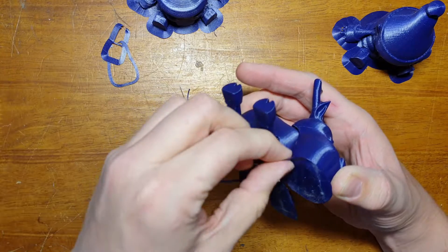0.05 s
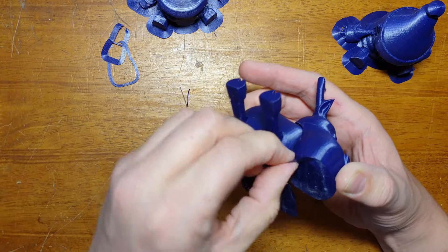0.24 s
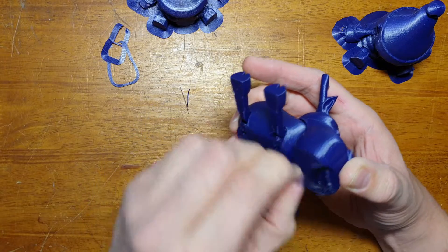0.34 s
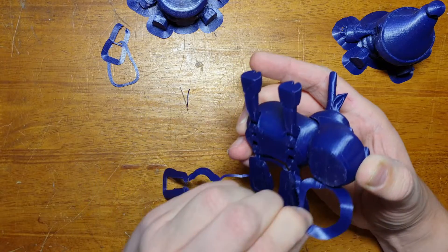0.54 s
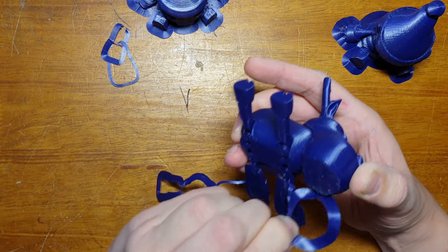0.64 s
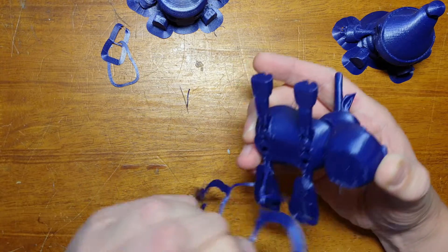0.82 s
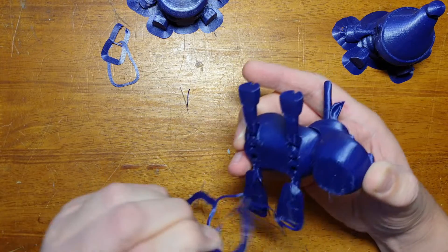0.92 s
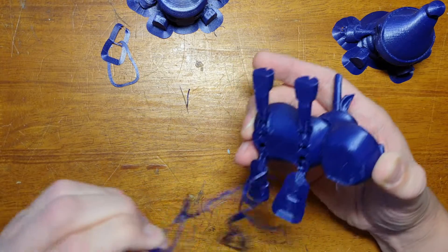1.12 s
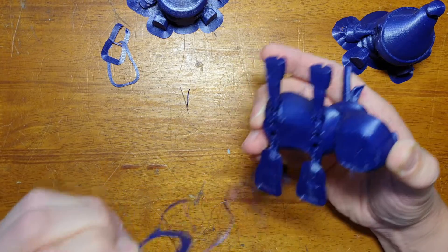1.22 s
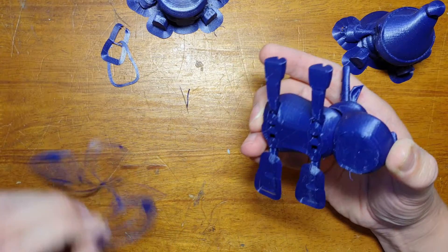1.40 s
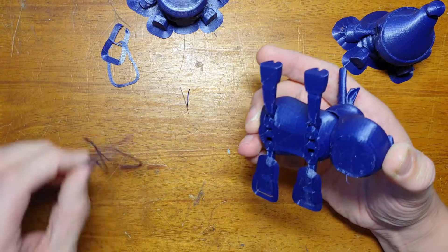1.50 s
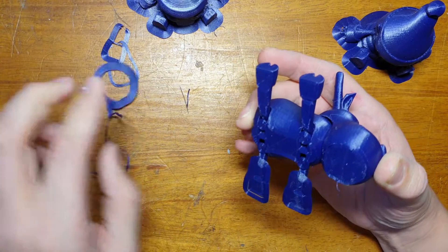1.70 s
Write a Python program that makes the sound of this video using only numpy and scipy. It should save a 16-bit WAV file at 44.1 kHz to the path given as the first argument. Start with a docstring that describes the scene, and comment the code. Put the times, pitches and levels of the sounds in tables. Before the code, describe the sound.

Brittle plastic strip snaps and crackles as fingers pull it off a small printed figure over a wooden table, building to a fast tearing run and a loudest last crack, then faint rubbing; close, dry, small room.

```python
"""A thin plastic brim is peeled by hand off a small printed figure, just above a wooden table in a small room.
Over quiet air (filtered noise), faint finger rumble and rubbing (noise following level curves) come first;
then ticks and snaps (bursts, snaps with rings), runs of tearing (random clicks and chips), soft bumps (dying
sines) and squeaks (gliding sines). A long rip rings the strip's modes, the hollow figure knocks, a deep sway
swells and a very high whistle rings. The last loud snap has a grainy tail; then fingers rub the loose strip."""
import sys
import numpy as np
from scipy import signal
from scipy.fft import rfft, irfft, next_fast_len
from scipy.io import wavfile
from scipy.ndimage import uniform_filter1d

SR = 44100
rng = np.random.default_rng(int(sys.argv[2]) if len(sys.argv) > 2 else 0)


def digitize_waveform(pressure):
    """Quantize a signal to 16-bit integers and store it at the path in sys.argv[1].

    Rows of a 2-D input are taken as channels; values are limited to [-1, 1].
    """
    field = np.atleast_2d(pressure).T
    bounded = np.clip(field, -1, 1)
    quanta = np.round(bounded * 32767).astype(np.int16)
    wavfile.write(sys.argv[1], SR, quanta)


N = 77175  # length in samples
T = np.arange(N) / SR  # time in seconds
LEFT_RIGHT = np.array([[1], [-1]])


def from_db(db):
    """Decibels to gain."""
    return 10 ** (np.asarray(db) / 20)


def unit(x):
    """Scale a stereo sound to an average energy of one per channel."""
    return x / np.sqrt(np.sum(x ** 2) / 2 + 1e-20)


def add(out, start_s, x):
    """Mix x into out from a start time, cutting it at the end of the scene."""
    i = int(np.clip(start_s * SR, 0, N - 1))
    out[:, i:i + x.shape[1]] += x[:, :N - i]


# Edges of the low, middle, treble and top bands. Each entry: frequency in Hz.
BAND_EDGES_HZ = [470, 1700, 4500, 9500, 17500]


def band(x, k):
    """Keep the low, middle, treble or top band (k = 0 to 3)."""
    sos = signal.butter(3, BAND_EDGES_HZ[k:k + 2], "band", fs=SR, output="sos")
    return signal.sosfilt(sos, x)


def pair(size, alike):
    """Stereo white noise; alike is the correlation of left and right."""
    mid, side = rng.standard_normal((2, size))
    c = np.clip(alike, -1, 1)
    return np.sqrt((1 + c) / 2) * mid + np.sqrt((1 - c) / 2) * side * LEFT_RIGHT


def coloured(x, points):
    """Filter by a curve of (Hz, dB) points, joined by straight lines over log frequency."""
    hz, db = np.transpose(points)
    size = next_fast_len(N + SR // 10)
    f = np.maximum(np.fft.rfftfreq(size, 1 / SR), 1)
    gain = from_db(np.interp(np.log(f), np.log(hz), db))
    return irfft(rfft(x, size) * gain, size)[:, :N]


def noise(points, alike):
    """Coloured stereo noise of rms one."""
    return unit(coloured(pair(N, alike), points)) * np.sqrt(N)


def level_curve(points):
    """Gain over the whole scene from (s, dB) points."""
    return from_db(np.interp(T, *np.transpose(points)))


def sine(t, hz):
    """A steady sine, the same on both sides."""
    return np.sin(2 * np.pi * hz * t) * np.ones((2, 1))


def ring(t, hz, t60, phase_spread):
    """A dying sine of unit energy; its phase (radians) is drawn apart for each side."""
    phase = phase_spread * rng.standard_normal((2, 1))
    return unit(from_db(-60 * t / t60) * np.sin(2 * np.pi * hz * t + phase))


# Left-right correlation of the fracture noise. One entry per band, low to top.
LIKENESS = [0.87, 0.47, 0.011, 0.089]


def burst(shape, shares_db):
    """Stereo noise under an envelope, with a given energy in each band."""
    out = 0
    for k, db in enumerate(shares_db):
        out = out + from_db(db) * unit(band(shape * pair(len(shape), LIKENESS[k]), k))
    return out


def placed(x, db, pan):
    """Set the level of a short sound; pan is left over right in dB."""
    per_10_ms = np.sqrt(SR / 100)  # unit energy becomes rms one over 10 ms
    return x * per_10_ms * from_db(db + pan * LEFT_RIGHT / 2)


# Random grains: rate, spread of their sizes, amplitude decay.
GRAINS_PER_S, GRAIN_SPREAD_DB, GRAIN_S = 480, 2.2, 0.0008


def grain_power():
    """Power of decaying grains at random moments and of random sizes; mean one."""
    born = rng.random(N) < GRAINS_PER_S / SR
    # twice the dB, since these are powers
    sizes = born * from_db(2 * GRAIN_SPREAD_DB * np.minimum(rng.exponential(1, N), 3))
    power = signal.lfilter([1], [1, -np.exp(-2 / (GRAIN_S * SR))], sizes + 1e-18)
    return power / power.mean()


# Colour of the room's air. Each row: frequency in Hz, relative level in dB.
AIR_COLOUR = [(30, -17), (110, 1), (240, -2), (400, -12.5), (550, -9), (900, -24.5), (3000, -37.5),
              (15000, -52.5)]
AIR_DB = -58  # rms


def air():
    """The quiet murmur of the room: steady noise, strongest in the bass."""
    return from_db(AIR_DB) * noise(AIR_COLOUR, 0.82)


# Dull rumble of the fingers on the figure. Each row: time in seconds, level in dB before the trim.
RUMBLE = [(0, -65), (.42, -56), (.48, -53), (.72, -70.5), (.93, -50.5), (1.03, -37.5), (1.14, -48),
          (1.36, -64.5), (1.44, -49), (1.75, -54)]
# Its colour. Each row: frequency in Hz, relative level in dB.
RUMBLE_COLOUR = [(35, -22.5), (70, -12), (130, -13), (250, -23), (600, -39.5), (2000, -68)]
RUMBLE_TRIM_DB = -2.5


def rumble():
    """Finger movement as nearly mono low noise that swells and sinks."""
    return from_db(RUMBLE_TRIM_DB) * level_curve(RUMBLE) * noise(RUMBLE_COLOUR, 0.99)


# Skin rubbing on plastic. Each row: time in seconds, level in dB.
RUB = [(0, -71.5), (.08, -86), (.4, -76), (.62, -55.5), (.74, -83.5), (1.0, -51), (1.33, -58),
       (1.39, -62.5), (1.41, -55), (1.47, -53.5), (1.53, -64), (1.59, -56.5), (1.7, -67), (1.745, -53)]
# Its colour. Each row: frequency in Hz, relative level in dB.
RUB_COLOUR = [(300, -7), (700, -5.5), (1200, -12.5), (2500, -25), (4800, -11.5), (15500, -13)]
RUB_GRAINY = 0.4  # share of the power that comes in grains


def rubbing():
    """Skin on plastic as wide noise, part smooth and part grainy."""
    grain = np.sqrt(1 - RUB_GRAINY + RUB_GRAINY * grain_power())
    return level_curve(RUB) * noise(RUB_COLOUR, 0.073) * grain


# Single threads parting. Each row: start in seconds, level in dB, left over right in dB.
TICKS = [(0.0967, -34, 2), (0.3316, -29.5, 1.5), (0.825, -16, 4), (1.0366, -27, 6), (1.0662, -18.5, 4),
         (1.0807, -21, 0), (1.138, -25, -7), (1.3607, -38, 3), (1.575, -45, 7)]
# Energy share of a tick in dB. One entry per band, low to top.
TICK_BANDS_DB = [-35.5, -25, -17.5, -11.5]
TICK_S = 0.003  # decay time constant


def ticks():
    """Thin threads break with a dry, bright click that dies at once, with no flutter."""
    out, shape = np.zeros((2, N)), np.exp(-T[:SR // 20] / TICK_S)
    for start, db, pan in TICKS:
        add(out, start, placed(burst(shape, TICK_BANDS_DB), db, pan))
    return out


EDGE_SHARE_DB = -6  # energy share of a snap's top band
SHARD_HZ, SHARD_DB, SHARD_T60_S = (3500, 16000), -3, 0.018


def shards(t, treble_db, count=6):
    """A broken edge rings at a few pitches of its own, drawn one from each step of a range."""
    edges = np.geomspace(*SHARD_HZ, count + 1)
    pitches = rng.uniform(edges[:-1], edges[1:])
    levels = np.interp(pitches, BAND_EDGES_HZ[2:4], [treble_db, EDGE_SHARE_DB])
    out = 0
    for hz, db in zip(pitches, levels):
        gain = from_db(db + SHARD_DB) * np.sqrt(hz / pitches.sum())
        out = out + gain * ring(t, hz, SHARD_T60_S, 1.73)
    return out


# The brim snaps; the free length of strip, and so its ring, changes each time.
# Each row: start in seconds, level in dB before the trim, low, middle and treble energy shares in dB,
# left over right in dB, ring of the strip in Hz.
SNAPS = [(0.121, -28.5, -26.5, -19, -14.5, 0.5, 3050), (0.1469, -25, -18.5, -16.5, -15.5, 1, 3980),
         (0.2337, -22.5, -26.5, -16, -36, 1, 4050), (0.244, -27, -32, -15.5, -33, -3, 4310),
         (0.2819, -22, -40, -19, -16.5, 1.5, 3360), (0.349, -27, -44, -23, -15.5, -1.5, 2750),
         (0.3718, -29, -39.5, -15.5, -22, 0, 3020), (0.4337, -28, -31, -17, -19.5, -6, 3080),
         (0.4572, -19, -25.5, -21, -34.5, 1, 3024), (0.468, -21, -27.5, -10, -11.5, 0, 3670),
         (0.497, -22, -46, -27, -13, 3.5, 4070), (0.5124, -12.5, -29, -15, -12.5, 0, 3670),
         (0.5213, -14.5, -27, -8.5, -15.5, 3.5, 2324), (0.5663, -20.5, -20.5, -10, -15.5, 2, 3083),
         (0.7678, -29, -17, -16, -9, 9, 2680), (0.7825, -16.5, -16, -8, -10, -1, 2180),
         (0.7944, -26.5, -37, 0.5, -17.5, 6, 2900), (0.8064, -23.5, -31, -40, -3.5, -5, 3350),
         (0.819, -17, -24.5, -4.5, -20, 2.5, 2180), (0.8383, -21.5, -7, -1.5, -1, 0.5, 2790),
         (0.8563, -15, -19, -6.5, -5.5, 0.5, 3080), (0.8908, -21, -14, -9, -8.5, 1.5, 2854),
         (0.9247, -23.5, -16.5, -8.5, -7, 1, 3250), (0.9624, -28.5, -22.5, -22, -6.5, 0.0, 2900),
         (1.0069, -16, -16, -10.5, -8.5, 2, 3230), (1.0234, -24.5, -11, -17, -16, 1, 3460),
         (1.0481, -29, -15.5, -10.5, -7, -11, 3300), (1.0632, -17.5, -22.5, -21, -14, 2.5, 3100),
         (1.0786, -23.5, -32, -20, -14, 2, 2195), (1.101, -26.5, -19, -7, -7, 0.0, 2940),
         (1.1478, -16.5, -21, -8, -10, 2, 2950), (1.1979, -7, -23.5, -12, -12, 1, 3090),
         (1.4042, -41, -17.5, -33, -15, 8.5, 4630)]
SNAP_TRIM_DB, CRACK_DB = -3.5, 3.5  # overall trim; crack against flutter
# Time constants: decay of the fracture, decay of the shaken strip, softening of the onset.
CRACK_S, FLUTTER_S, SNAP_RISE_S = 0.00022, 0.0057, 0.00062
TABLE_ECHO_S, TABLE_ECHO_DB = 0.0021, -12
RING_DB, RING_T60_S = -2.5, 0.024  # ring level is against the middle share


def snaps():
    """A sharp fracture, its echo off the table, brief flutter, and the rings of strip and broken edge."""
    out, t = np.zeros((2, N)), T[:SR // 16]
    crack = from_db(CRACK_DB) * np.exp(-t / CRACK_S)
    echo = from_db(TABLE_ECHO_DB) * np.interp(t - TABLE_ECHO_S, t, crack, left=0)
    flutter = np.exp(-t / FLUTTER_S)
    shape = (crack + echo + flutter) * (1 - np.exp(-t / SNAP_RISE_S))
    for start, db, low, middle, treble, pan, hz in SNAPS:
        fracture = burst(shape, [low, middle, treble, EDGE_SHARE_DB])
        strip_ring = from_db(middle + RING_DB) * ring(t, hz, RING_T60_S, 0.4)
        snap = fracture + strip_ring + shards(t, treble)
        add(out, start, placed(snap, db + SNAP_TRIM_DB, pan))
    return out


CHIP_T60_S = 0.012


def chips(pull, k):
    """Tiny grains that each ring at one random pitch in band k, as strong as the pull."""
    out, draws = np.zeros((2, N)), rng.random((int(GRAINS_PER_S * N / SR), 3))
    sizes = from_db(-GRAIN_SPREAD_DB * np.log(np.maximum(draws[:, 2], 1 / 20)))
    sizes = sizes / np.sqrt(np.mean(sizes ** 2))
    for n, ((when, pitch, _), size) in enumerate(zip(draws, sizes)):
        i = int((n + when) / len(draws) * N)  # one chip at random in each equal slot
        if pull[i] > 0:
            hz = np.interp(pitch, [0, 1], BAND_EDGES_HZ[k:k + 2])
            chip = ring(T[:SR // 60], hz, CHIP_T60_S, (k + 1) / 2)
            add(out, T[i], pull[i] * size * chip)
    return out * np.sqrt(SR / GRAINS_PER_S)


# Runs of tearing; the last row is the grainy room tail of the last loud snap.
# Each row: start in seconds, end in seconds, level at start in dB, level at end in dB
# (both before the band levels), extra level of the low and middle bands in dB.
TEARS_AND_TAIL = [(0.156, 0.164, -46, -58, 11), (0.239, 0.251, -43.5, -38, -11.5),
                  (0.361, 0.443, -56.5, -45.5, 2), (0.434, 0.508, -45.5, -46, 2.5),
                  (0.774, 0.865, -34.5, -34.5, 3.5), (0.854, 0.937, -66.5, -39, 7.5),
                  (1.009, 1.096, -36.5, -50, 3.5), (1.212, 1.261, -33.5, -43, -14)]
# Balance of these grains in dB. One entry per band, low to top.
TEAR_BANDS_DB = [-11.5, -1, -0.5, 4.5]
RINGING_SHARE = 0.6  # share of the power in ringing chips; the rest clicks


def tearing_and_tail():
    """Bonds tear in random clicks and ringing chips; the same grains make the last loud snap's room tail."""
    clicks, out = np.sqrt((1 - RINGING_SHARE) * grain_power()), 0
    for k, band_db in enumerate(TEAR_BANDS_DB):
        pull = np.zeros(N)
        for start, end, first_db, last_db, body_db in TEARS_AND_TAIL:
            db = np.interp(T, [start, end], [first_db, last_db]) + body_db * (k < 2)
            pull += (T >= start) * (T < end) * from_db(db)
        width = 2 * (BAND_EDGES_HZ[k + 1] - BAND_EDGES_HZ[k]) / SR  # share of the noise power in the band
        crackle = band(pull * clicks * pair(N, LIKENESS[k]) + 1e-18, k) / np.sqrt(width)
        ringing = np.sqrt(RINGING_SHARE) * chips(pull, k)
        out = out + from_db(band_db) * (crackle + ringing)
    return out * from_db(LEFT_RIGHT * 1.8)  # leans left


# Soft bumps of the hands. Each row: start in seconds, pitch in Hz, level in dB before the soft onset,
# fall by 60 dB in seconds.
BUMPS = [(0.157, 81, -38.5, 0.2), (.24, 79.5, -32.5, 0.1), (0.519, 80, -39, 0.16), (0.798, 72, -29, 0.14),
         (1.021, 70.9, -34, 0.32), (1.09, 66, -40, 0.093)]
BUMP_RISE_S = 0.01  # time constant of the onset


def bumps():
    """Dull hand bumps: low sines with a soft onset that die away."""
    out, t = np.zeros((2, N)), T[:SR // 3]
    onset = 1 - np.exp(-t / BUMP_RISE_S)
    for start, hz, db, t60 in BUMPS:
        add(out, start, onset * from_db(db - 60 * t / t60) * sine(t, hz))
    return out


# Short squeaks of the strip; the last row is a very high, rough whistling ring.
# Each row: start in seconds, length in seconds, first pitch in Hz, last pitch in Hz, peak level in dB.
SQUEAKS_AND_WHISTLE = [(0.349, 0.017, 2880, 3230, -38), (0.437, 0.034, 3003, 2964, -39.5),
                       (0.467, 0.011, 3535, 3710, -30.5), (0.4965, 0.0095, 7040, 7700, -30.5),
                       (1.0795, 0.014, 15250, 15000, -22)]
SQUEAK_RISE = 0.15  # share of the length spent swelling
SQUEAK_WAVER, WAVER_S = 0.02, 0.0012  # rms share of the pitch, smoothing time


def squeaks_and_whistle():
    """Each squeak, and the whistling ring, is one wavering, gliding sine that swells quickly and fades."""
    out = np.zeros((2, N))
    for start, length, first_hz, last_hz, db in SQUEAKS_AND_WHISTLE:
        waver = uniform_filter1d(rng.standard_normal(SR // 10), int(WAVER_S * SR))
        waver = waver * np.sqrt(WAVER_S * SR)  # back to about rms one
        along = T[:SR // 10] / length
        hz = np.interp(along, [0, 1], [first_hz, last_hz]) * (1 + SQUEAK_WAVER * waver)
        swell = np.interp(along, [0, SQUEAK_RISE, 1], [0, 1, 0])
        phase = 2 * np.pi * np.cumsum(hz) / SR + rng.standard_normal((2, 1)) / 2
        add(out, start, from_db(db) * swell * np.sin(phase))
    return out


# Modes of the taut strip. Each row: pitch in Hz, relative level in dB, fall by 60 dB in seconds.
STRIP_MODES = [(1088, -10, 0.15), (1960, 0, 0.22), (2110, 0, 0.25), (2210, -0.5, 0.063), (2620, -14, 0.19),
               (2774, 2.5, 0.12), (4600, -11.5, 0.104), (6490, 2, 0.056)]
RIP_START_S, RIP_END_S, STRIP_DB = 0.778, 0.865, -45


def strip():
    """The long rip, as a stretch of noise, drives the narrow modes of the taut strip."""
    drive = pair(N, 1.0) * (T > RIP_START_S) * (T < RIP_END_S)
    out = np.zeros((2, N))
    for hz, db, t60 in STRIP_MODES:
        response = ring(T[:SR // 4], hz, t60, 0)
        mode = signal.fftconvolve(drive, response, axes=1)[:, :N]
        out += from_db(db) * unit(mode)
    return from_db(STRIP_DB) * out * np.sqrt(SR / 10)  # unit energy becomes rms one over 100 ms


# The hollow figure knocks as it is let go. Each row: start in seconds, pitch in Hz, peak level in dB.
KNOCKS = [(.925, 750, -38), (1.099, 1250, -44.5), (1.149, 1070, -35), (1.199, 750, -32.5),
          (1.199, 542, -38)]
KNOCK_T60_S = 0.032


def knocks():
    """The figure's shell sounds its low modes at each release, as quickly dying sines."""
    out, t = np.zeros((2, N)), T[:SR // 5]
    for start, hz, db in KNOCKS:
        add(out, start, from_db(db - 60 * t / KNOCK_T60_S) * sine(t, hz))
    return out


# Deep sway of the air and table as the hands move. Each row: time in seconds, level in dB.
SWAY = [(0, -89.5), (.93, -74), (.98, -39), (1.06, -40), (1.17, -48), (1.37, -71.5), (1.43, -51.5),
        (1.75, -58.5)]
# Its colour. Each row: frequency in Hz, relative level in dB.
SWAY_COLOUR = [(12, -14.5), (27, 2), (42, -17.5), (200, -70.5)]


def sway():
    """Air and table sway with the hands: very deep noise following a level curve."""
    return level_curve(SWAY) * noise(SWAY_COLOUR, 0.91)


# Resonances of strip and figure. Each row: frequency in Hz, width in Hz, boost in dB.
RESONANCES = [(824, 29, 4.5), (7060, 100, 5), (7780, 190, 4.5)]
# Colour of the plastic. Each row: frequency in Hz, gain in dB.
PLASTIC_COLOUR = [(400, -5.5), (1000, -6.5), (3500, -5), (6000, -1.5), (9000, -4), (15500, 0)]


def body(x):
    """The strip and the figure ring briefly at their resonances and colour the sound."""
    for hz, width, db in RESONANCES:
        b, a = signal.iirpeak(hz, hz / width, fs=SR)
        x = x + (from_db(db) - 1) * signal.lfilter(b, a, x + 1e-18)
    return coloured(x, PLASTIC_COLOUR)


# Fall of the room's tail by 60 dB, in seconds. One entry per band, low to top.
ROOM_T60_S = [0.23, 0.19, 0.16, 0.14]
ROOM_DB, ROOM_GAP_S = -8, 0.0022  # tail energy; silence before the tail, then a rise as long


def room(x):
    """A short diffuse tail, even in colour, that dies a little sooner in the treble."""
    t = T[:SR // 3]
    white = pair(len(t), 0.07) * np.clip(t / ROOM_GAP_S - 1, 0, 1)
    # even out the spectrum that an average decay would leave
    decay = from_db(-60 * t / np.mean(ROOM_T60_S))
    strength = uniform_filter1d(np.sum(abs(rfft(white * decay)) ** 2, axis=0), size=30)
    white = irfft(rfft(white) / np.sqrt(strength), len(t))
    tail = sum(band(white * from_db(-60 * t / t60), k) for k, t60 in enumerate(ROOM_T60_S))
    return from_db(ROOM_DB) * signal.fftconvolve(x, unit(tail), axes=1)[:, :N]


def scene():
    """The plastic and its room tail, with the hands, over the quiet murmur of the air."""
    hands = rumble() + rubbing() + bumps() + sway()
    coloured_by_body = body(ticks() + snaps() + tearing_and_tail())
    plastic = coloured_by_body + squeaks_and_whistle() + strip() + knocks()
    return air() + hands + plastic + room(plastic)


FULL_SCALE, CUTOFF_HZ = 0.9, 15900  # ceiling of the rounded peaks; top of the sound


def record(dry):
    """The loudest peaks are rounded and the top is cut steeply."""
    rounded = FULL_SCALE * np.tanh(dry / FULL_SCALE)
    top_cut = signal.ellip(10, 0.2, 75, CUTOFF_HZ, fs=SR, output="sos")
    return signal.sosfilt(top_cut, rounded)


dry = scene()
out = record(dry)
digitize_waveform(out)
```